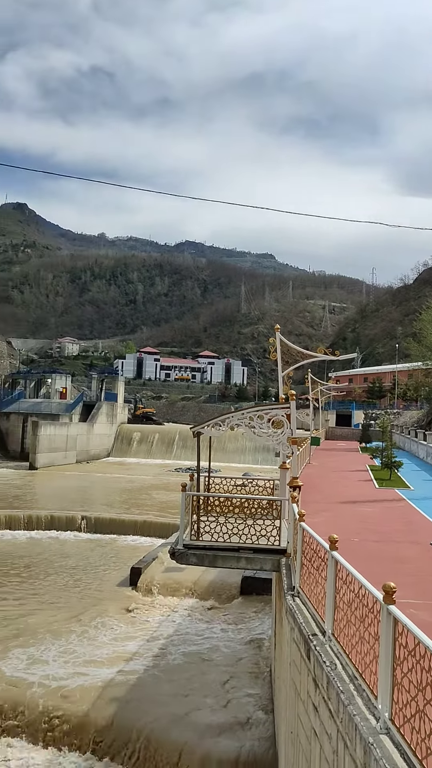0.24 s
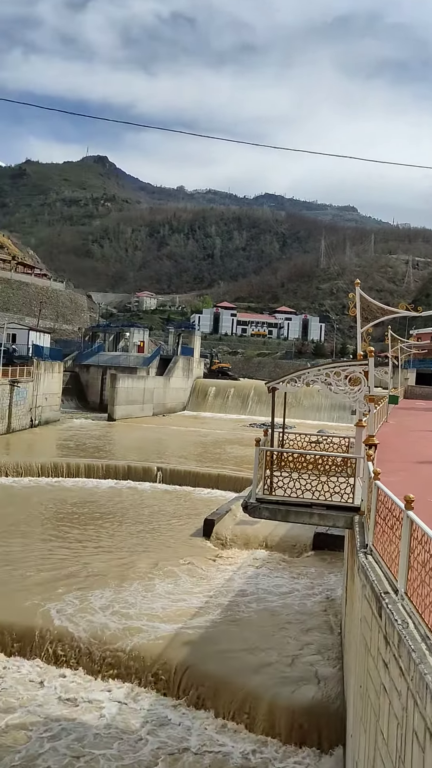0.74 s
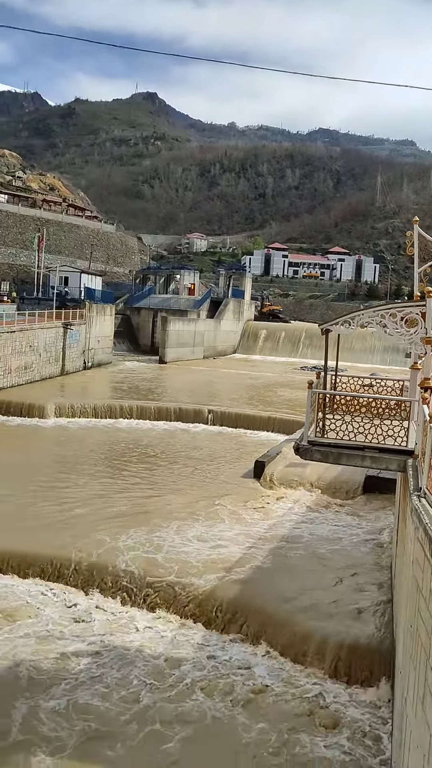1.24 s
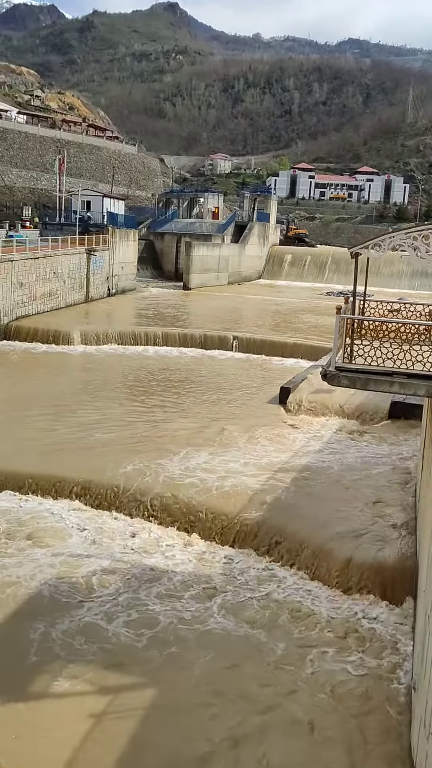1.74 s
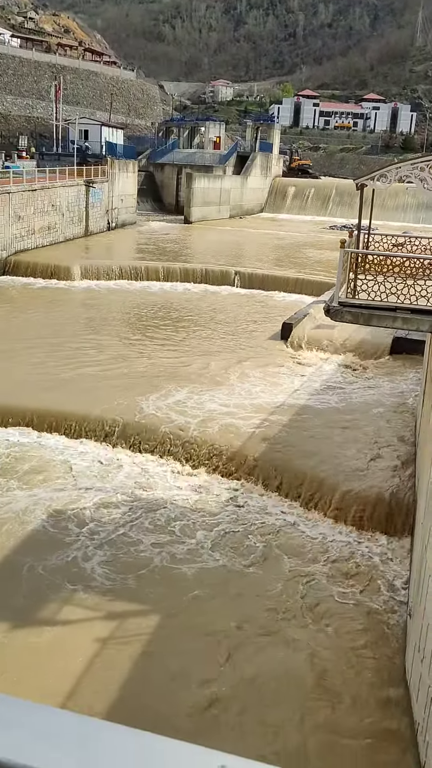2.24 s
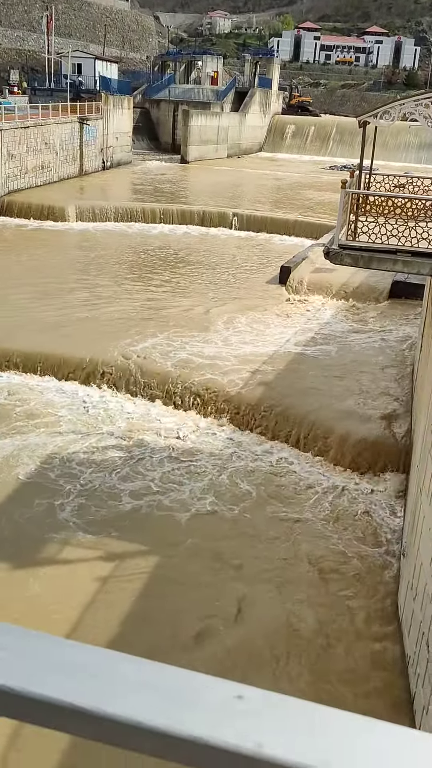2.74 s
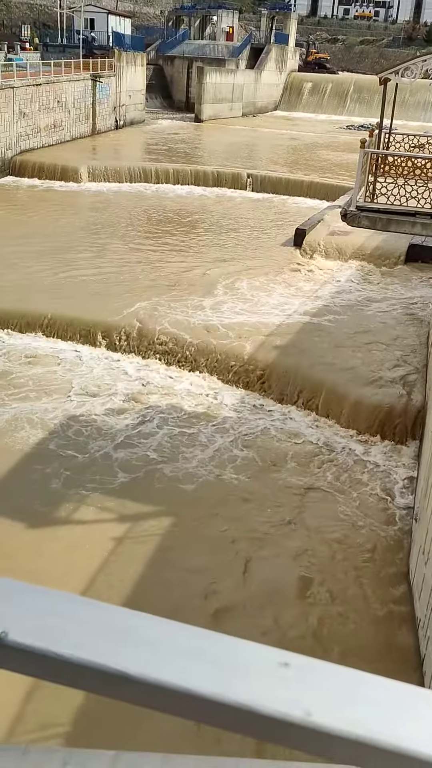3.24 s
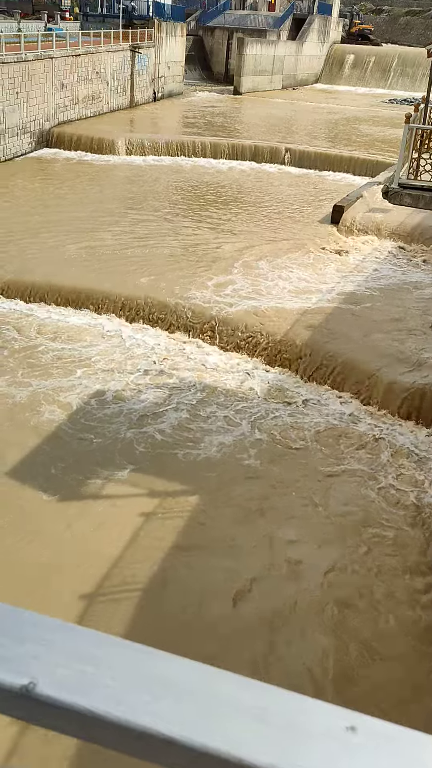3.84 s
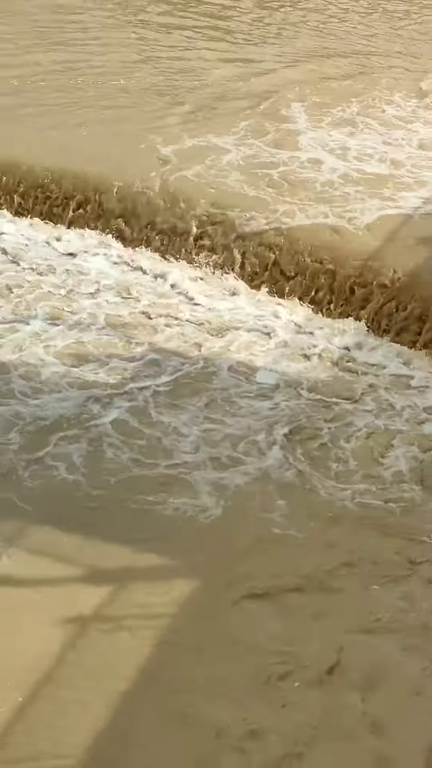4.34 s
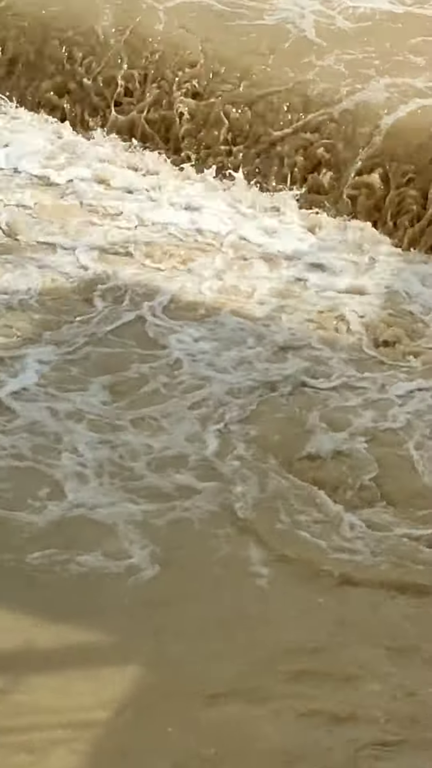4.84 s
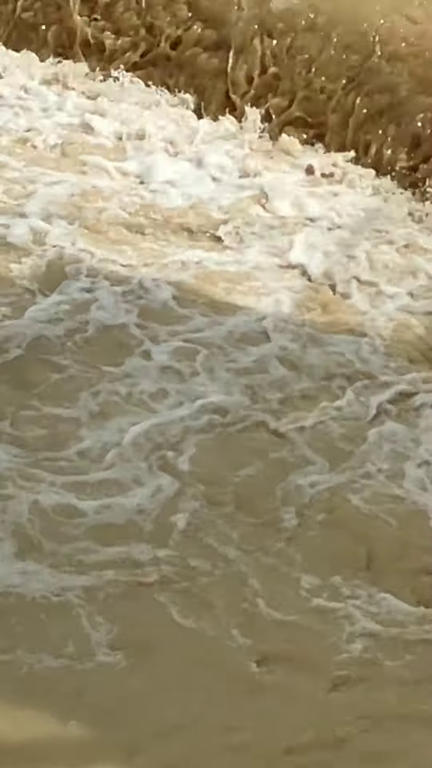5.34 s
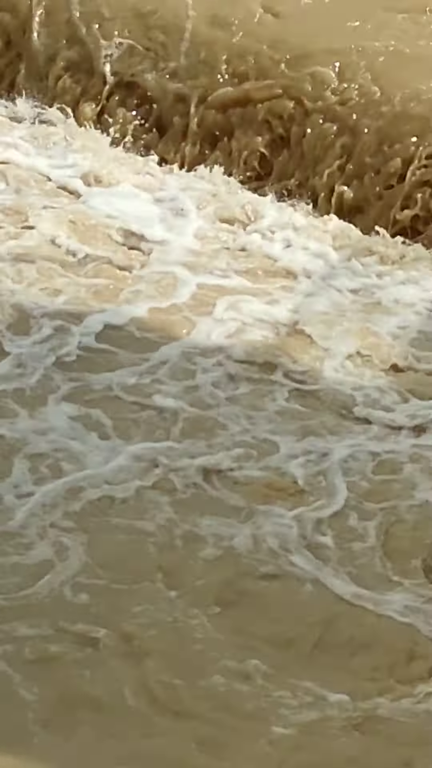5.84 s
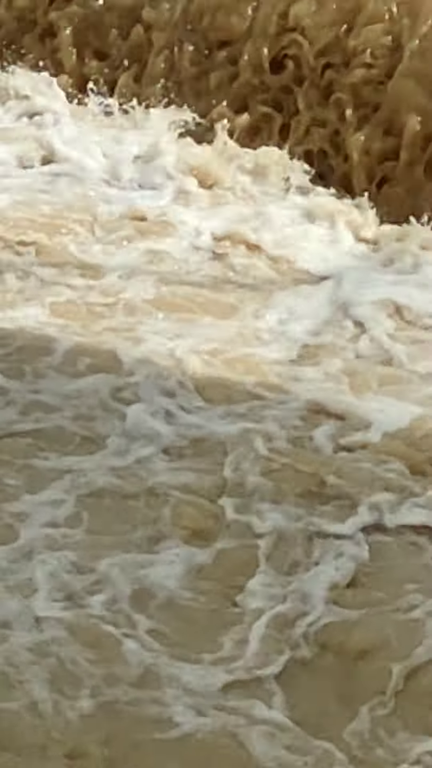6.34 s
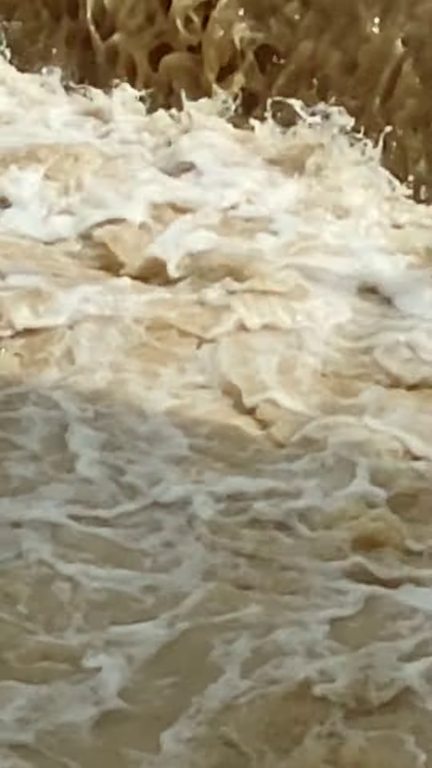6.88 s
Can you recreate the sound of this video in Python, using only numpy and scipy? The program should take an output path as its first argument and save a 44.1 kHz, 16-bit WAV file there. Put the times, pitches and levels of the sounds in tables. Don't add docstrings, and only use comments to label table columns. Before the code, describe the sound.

From 0 seconds a muddy river roars steadily over a curved weir, outdoors and fairly close, caught by a handheld stereo phone. The body is a dense low roar of trapped air around a few hundred hertz, with churning water and splashes above it and a softer, slightly watery, grainy foam hiss on top. At first the sound reaches the left side earlier; by about 2.9 seconds it faces the fall, then turns slightly past. The flow swells gently near 0.5, dips around 1.9 to 2.6, recovers by 3.5, is fullest near 5.3 and stays strong to the end at 7.1. Short low gulps, each a quick rising ring, appear faintly at 0.5, 2.1, 3.7, 4.4, 5.0, 5.3, 6.0 and 6.7, with one clearly louder at 2.6. Soft, brief wind puffs flutter in the bass throughout, firmer at the start, 5.1 and 6.4.

```python
import sys
import numpy as np
from scipy import signal
from scipy.fft import rfft, irfft, next_fast_len
from scipy.io import wavfile
from scipy.ndimage import uniform_filter1d, map_coordinates

SR = 44100
rng = np.random.default_rng(int(sys.argv[2]) if len(sys.argv) > 2 else 0)


def inscribe(sig):
    pcm = np.round(np.clip(np.atleast_2d(sig).T, -1, 1) * 32767)
    wavfile.write(sys.argv[1], SR, pcm.astype(np.int16))


def level_to_linear(level):
    exponent = np.asarray(level, float) / 20
    return 10 ** exponent


N = 313550

# (time [s], lead of the left port [samples])
TURN = [
    (0, 10),
    (1.04, 6),
    (2.44, .7),
    (2.9, .2),
    (3.2, -1.1),
    (4.3, -1.5),
    (5.3, -1.6),
    (7.11, -.7),
]
PUFF_RISE_S, PUFF_FALL_S = 0.014, 0.029


def unit(x):
    return x / np.sqrt(np.mean(np.abs(x) ** 2) + 1e-20)


def along(points, hz):
    f, v = np.transpose(points)
    return np.interp(np.log(hz + 1), np.log(f + 1), v)


def curves(rows, t):
    s, *cols = np.transpose(rows)
    return [np.interp(t, s, c) for c in cols]


def wobble(rate):
    return map_coordinates(rng.standard_normal(400), [np.arange(N) * rate / SR % 399])


def filtered(x, response):
    m = next_fast_len(N + 8192)
    return irfft(rfft(x, m) * response(np.fft.rfftfreq(m, 1 / SR)), m)[..., :N]


def bubbles(low_hz, high_hz, cycles, spread_db, count):
    when, pitch, size = rng.random((count, 3)).T
    hz = (low_hz * (high_hz / low_hz) ** pitch)[:, None]
    t = np.arange(int(3 * cycles * SR / low_hz)) / SR
    age = t * hz / cycles
    ring = age * np.exp(-2.5 * age) * np.sin(2 * np.pi * hz * t * (1 + 0.086 * age))
    loudness = level_to_linear(-spread_db * np.log(size))[:, None]
    ring *= loudness * np.sqrt(hz)
    at = (when * N).astype(int)[:, None] + np.arange(len(t))
    return unit(np.bincount(at.ravel(), ring.ravel(), N)[:N])


def port(hz):
    # (centre [Hz], width [Hz], level [dB])
    resonances = [(6760, 1420, 14.5), (15570, 1200, -1)]
    return 1 + sum(level_to_linear(db) * 1j * hz * w / (c * c - hz * hz + 1j * hz * w) for c, w, db in resonances)


def water(spectrum, grains, grainy, patchy_db):
    # (frequency [Hz], share [0-1])
    direct_share = [(150, 0.972), (280, 0.93), (400, 0.8), (520, 0.58), (700, 0.83), (1200, 0.61),
                    (2100, 0.45), (3300, 0.33), (4300, 0.43), (6900, 0.4), (9500, 0.42), (12000, 0.47),
                    (15000, 0.27)]
    # (frequency [Hz], change [share])
    direct_aside = [(250, 0), (350, .08), (480, .3), (650, .05), (4500, .05), (7500, .25), (10000, -.2),
                    (15000, -.1)]
    # (frequency [Hz], level [dB])
    hand_shadow = [(250, -0.5), (400, 2.5), (500, 3.5), (620, -2), (1300, 2.5), (2600, 0), (3600, 2.5),
                   (4500, 2), (6000, -3.5), (9000, 0.5)]
    # (frequency [Hz], lead of the left port [radians])
    case_bend = [(1500, 0), (2400, -.4), (4300, .4), (6500, 0), (10300, -.8), (13800, -.6)]

    raw = rng.standard_normal((2, N))
    share = np.clip(grainy, 0, 1)
    raw[0] = np.sqrt(1 - share) * raw[0] + np.sqrt(share) * grains
    hz, t, z = signal.stft(raw, SR, nperseg=512)
    rows_hz = hz[:, None]

    field = uniform_filter1d(rng.standard_normal(z.shape[1:]), size=5, axis=0)
    field = uniform_filter1d(field, size=10, axis=1)
    z = z * level_to_linear(patchy_db * unit(field))

    ahead = curves(TURN, t)[0]
    aside = ahead / 10
    z[0] *= level_to_linear(along(hand_shadow, hz)[:, None] * aside)
    direct = along(direct_share, hz)[:, None] + along(direct_aside, hz)[:, None] * aside
    mix_angle = np.arccos(np.clip(direct, 0, 1)) / 2
    near, far = np.cos(mix_angle) * z[0], np.sin(mix_angle) * z[1]

    ahead = ahead / (1 + (650 / (rows_hz + 1)) ** 2)
    lead = np.exp(1j * np.pi * rows_hz * ahead / SR + .5j * along(case_bend, hz)[:, None])
    pair = signal.istft(np.array([(near + far) * lead, (near - far) / lead]), SR, nperseg=512)[1]
    return unit(filtered(pair[:, :N], lambda f: level_to_linear(along(spectrum, f)) * port(f)))


def weir():
    # (time [s], level [dB])
    flow = [
        (0, 0),
        (.55, 1),
        (1.25, 0.5),
        (1.9, -1.5),
        (2.6, -1.1),
        (3.5, 0.5),
        (4.3, -0.5),
        (5.3, 3),
        (6.2, 0.8),
        (7.11, 1.5),
    ]
    # (frequency [Hz], level [dB per Hz])
    plunge_colour = [(15, -66), (48, -60), (65, -24), (110, -10.5), (190, -2.5), (270, 1), (400, 2),
                     (520, -4), (700, -30.5)]
    churn_colour = [(300, -42), (520, -3), (700, -5.5), (1000, -8), (1500, -10), (2000, -13.5), (2600, -48)]
    splash_colour = [(1400, -37), (2000, -6), (2500, -6), (3100, -11), (4000, -15), (4900, -23.5),
                     (6000, -31.5)]
    foam_colour = [(3500, -2), (5200, -6.5), (8000, -2.5), (10200, -10), (13000, -28), (16000, -15)]
    # (plunge [dB], churn [dB], splash [dB], foam [dB])
    facing_db = [-26, -28.5, -33.5, -39.5]
    # (plunge [dB], churn [dB], splash [dB], foam [dB])
    aside_db = [0.99, -0.32, -0.57, 0]
    swell_share = [0.43, 0.26, 0.22, 0.19]

    t = np.arange(N) / SR
    aside, swell_db = curves(TURN, t)[0] / 10, curves(flow, t)[0]
    plunge_db, churn_db, splash_db, foam_db = (
        level + turned * aside + follows * swell_db
        for level, turned, follows in zip(facing_db, aside_db, swell_share))
    surge = wobble(4.4)

    air_clouds = bubbles(196.8, 463, cycles=1.96, spread_db=1.0, count=2000)
    plunge = water(plunge_colour, air_clouds, grainy=0.019, patchy_db=-0.9)
    churned = bubbles(542, 2250, cycles=2.1, spread_db=-0.5, count=3000)
    churn = water(churn_colour, churned, grainy=0.015, patchy_db=-0.62)
    drops = bubbles(1935, 5530, cycles=9.7, spread_db=-1.5, count=7000)
    splash = water(splash_colour, drops, grainy=0.0081, patchy_db=-1.03)
    fizz = bubbles(4540, 19400, cycles=4.3, spread_db=5.5, count=20000)
    foam = water(foam_colour, fizz, grainy=0.036, patchy_db=-1.0)
    return (level_to_linear(plunge_db + 0.14 * surge) * plunge
            + level_to_linear(churn_db + 0.067 * surge) * churn
            + level_to_linear(splash_db + 0.045 * surge) * splash
            + level_to_linear(foam_db + 0.094 * surge) * foam)


def puffs(rows):
    s, db = np.transpose(rows)[..., None]
    since = np.arange(0, N, 64) / SR - s
    shape = np.exp(-(since / np.where(since < 0, PUFF_RISE_S, PUFF_FALL_S)) ** 2)
    return np.repeat((level_to_linear(db) * shape).sum(axis=0), 64)[:N]


def breeze():
    # (frequency [Hz], level [dB per Hz])
    wind_colour = [(15, -13), (30, -28), (60, 7), (100, 6), (150, -16), (220, -52)]
    # (time [s], peak level [dB])
    shared_puffs = [(0.009, -40), (0.216, -50), (0.434, -50), (0.529, -43), (0.73, -45), (0.809, -47),
                    (1.194, -46), (1.419, -58), (1.53, -53), (1.599, -56), (1.832, -57), (1.948, -47),
                    (2.138, -56), (2.426, -55), (2.659, -58), (2.755, -53), (2.829, -50), (2.913, -51),
                    (3.1, -46), (3.459, -52), (3.596, -46), (3.809, -49), (3.945, -56), (4.074, -54),
                    (4.331, -48), (4.499, -48), (4.63, -51), (4.744, -55), (4.83, -50), (5.097, -40.5),
                    (5.291, -44), (5.538, -44), (5.713, -45), (5.979, -50), (6.149, -51), (6.237, -49),
                    (6.427, -40), (6.58, -47), (6.889, -43), (7.059, -43)]
    # (time [s], peak level [dB])
    lone_puffs = [(1.12, -56), (1.31, -60), (1.54, -56), (3.79, -57), (4.0, -44), (4.08, -61), (4.3, -56),
                  (4.47, -54), (4.57, -58), (4.64, -56), (6.14, -55)]
    calm_db = -82

    shared, own = filtered(rng.standard_normal((2, N)), lambda hz: level_to_linear(along(wind_colour, hz)))
    gusts = np.roll(puffs(shared_puffs), int(PUFF_RISE_S * SR))
    strength = level_to_linear(calm_db) + level_to_linear(-2.5) * gusts
    both = strength * level_to_linear(1.9 * wobble(17)) * unit(shared)
    own = puffs(lone_puffs) * unit(own)
    return both + np.array([own, -own])


def gulps():
    # (time [s], peak level [dB], pitch [Hz])
    pockets = [
        (0.535, -18, 337),
        (2.054, -20, 342),
        (2.607, -8.5, 430),
        (3.728, -20, 296),
        (4.436, -22, 380),
        (4.999, -19, 260),
        (5.348, -19, 336),
        (5.971, -21, 280),
        (6.74, -19, 342),
    ]
    out, t = np.zeros(N + SR), np.arange(SR // 20) / SR
    swell = t / .002
    for s, db, hz in pockets:
        ring = np.sin(2 * np.pi * hz * t * (1 + .09 * swell))
        out[round(s * SR):][:len(t)] += level_to_linear(db - 4) * swell * np.exp(1 - swell) * ring
    return out[:N]


def scene():
    # (frequency [Hz], level [dB])
    louder_left = [(150, 0), (300, .9), (600, .4), (1300, .8), (3000, .4), (6500, 1.2), (10000, 1.8),
                   (15000, 3.6)]
    # (frequency [Hz], level [dB])
    narrower = [(700, 0), (1200, -1), (3000, -1), (5000, -.5), (9000, -.7), (13000, -.2)]

    left, right = filtered(weir(), lambda hz: level_to_linear(along(louder_left, hz) * [[.5], [-.5]]))
    side = filtered((left - right) / 2,
                    lambda hz: level_to_linear(along(narrower, hz)) * 1.12 / (1 + (150 / (hz + 1)) ** 6))
    mid = (left + right) / 2 + gulps()
    return np.array([mid + side, mid - side]) + breeze()


def suppress(x):
    # (frequency [Hz], share of the local power taken off)
    noise_share = [(800, 0), (1500, .25), (2800, .52), (4200, .9), (5600, .9), (6700, .85), (8300, .92),
                   (10000, .95), (12500, 1), (15000, .78)]
    waver_db = 5

    hz, t, z = signal.stft(x, SR, nperseg=2048, noverlap=1536)
    rows_hz = hz[:, None]
    power = np.abs(z) ** 2 + 1e-20

    def blur(bins, frames):
        return np.abs(uniform_filter1d(uniform_filter1d(power, size=bins, axis=1), size=frames, axis=2))

    cut = along(noise_share, hz)[:, None] * blur(70, 12)
    lines = np.clip(1 - .8 * cut / blur(1, 2), .002, 1)
    patches = np.clip(1 - (.81 * cut / blur(6, 4)) ** 3, .003, 1)

    wide = blur(9, 3)
    drift = unit(uniform_filter1d(rng.standard_normal(len(t)), size=4))
    waver = .05 * level_to_linear(2 * waver_db * drift)
    threshold = .02 + waver / (1 + (rows_hz / 520) ** 6 + (130 / (rows_hz + 1)) ** 6)
    patches[1] *= wide[1] > threshold * wide[0]
    gain = lines * patches

    kept = uniform_filter1d(power * gain, size=90, axis=1) / uniform_filter1d(power, size=90, axis=1)
    kept = np.abs(uniform_filter1d(kept, size=3, axis=2)) + .02
    gain *= np.where(rows_hz > 900, kept.mean(axis=2, keepdims=True) / kept, 1)
    return signal.istft(z * np.sqrt(gain), SR, nperseg=2048, noverlap=1536)[1][:, :N]


def band_limit(x):
    return signal.sosfilt(signal.butter(12, 15740, fs=SR, output="sos"), x)


def record(dry):
    soft = dry / (1 + np.abs(dry / .37) ** 4) ** (1 / 4)
    mid, side = suppress(np.array([soft[0] + soft[1], soft[0] - soft[1]]) / 2)
    pair = filtered(np.array([mid + side, mid - side]), lambda hz: hz < 15740)
    return band_limit(pair)


dry = scene()
out = record(dry)
inscribe(out)
```